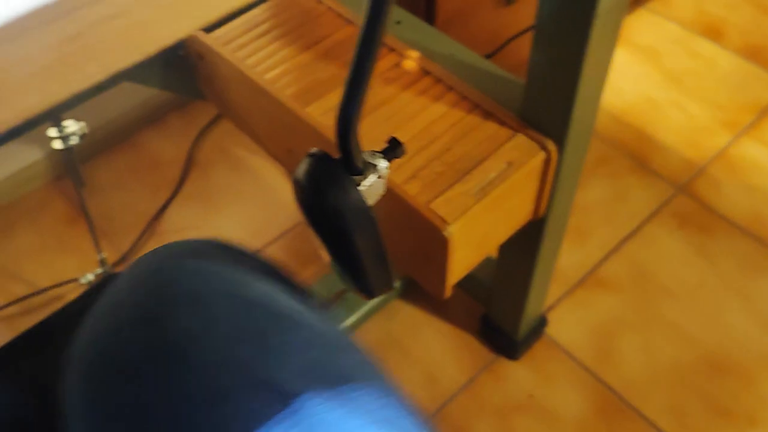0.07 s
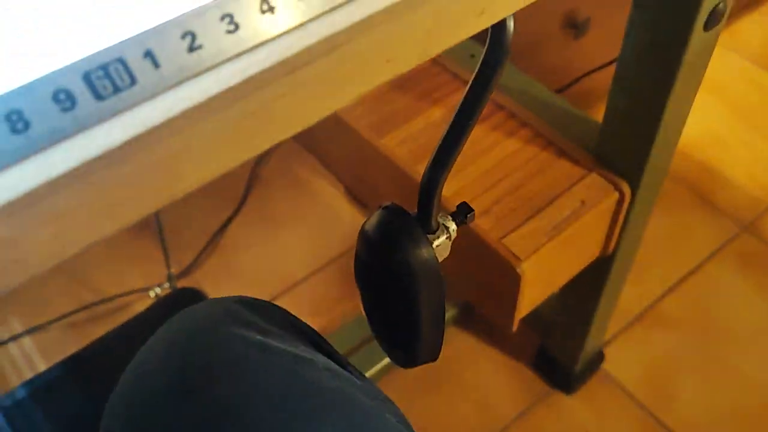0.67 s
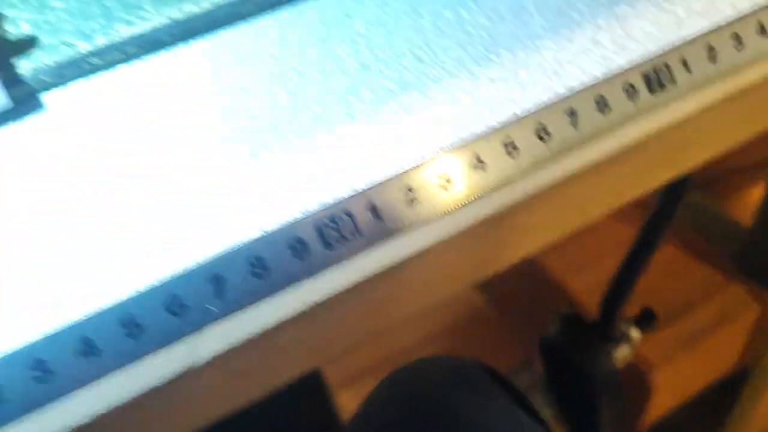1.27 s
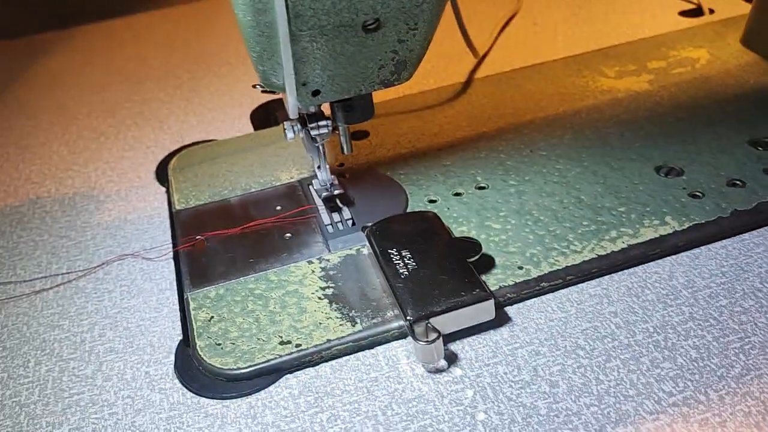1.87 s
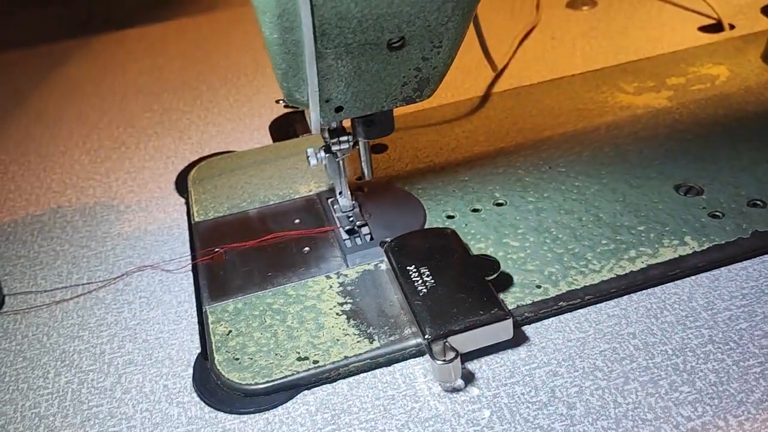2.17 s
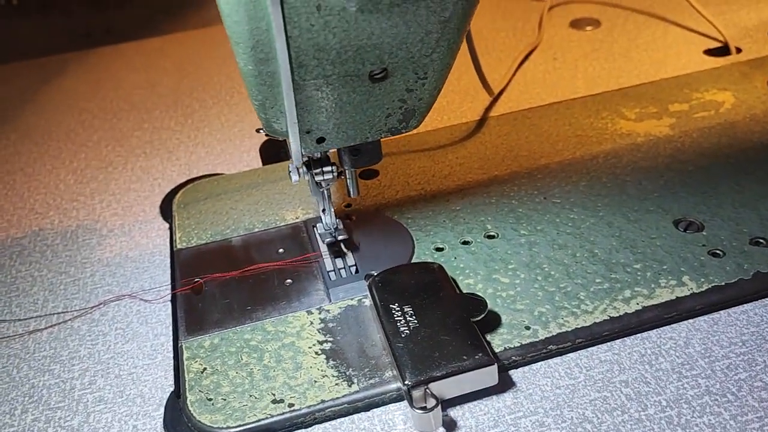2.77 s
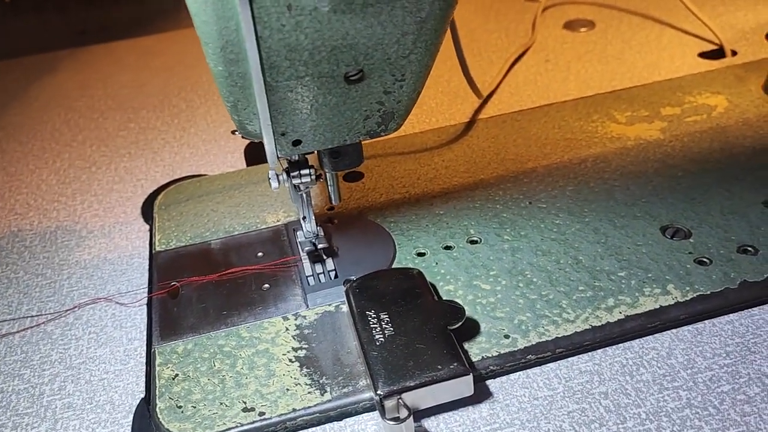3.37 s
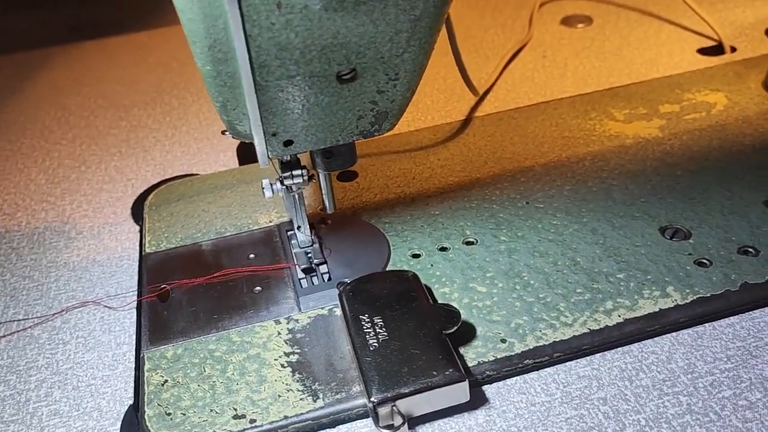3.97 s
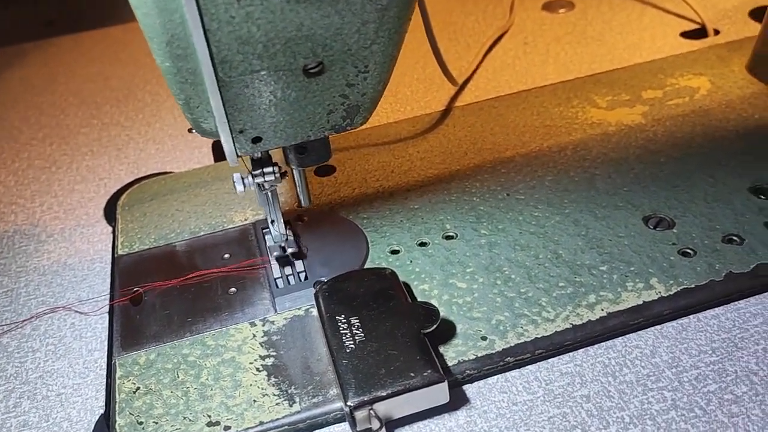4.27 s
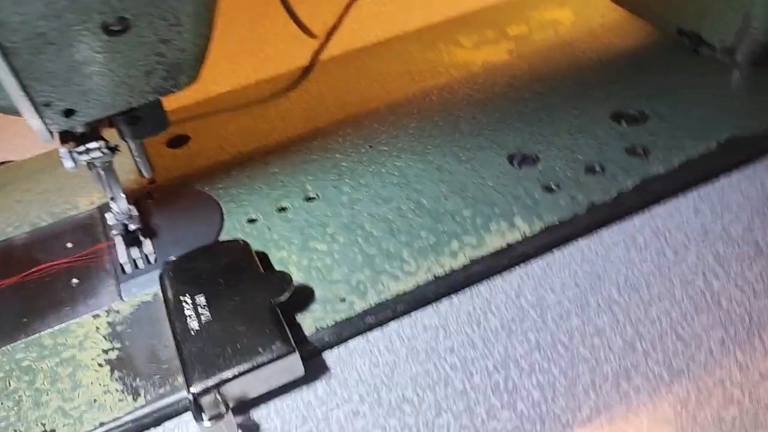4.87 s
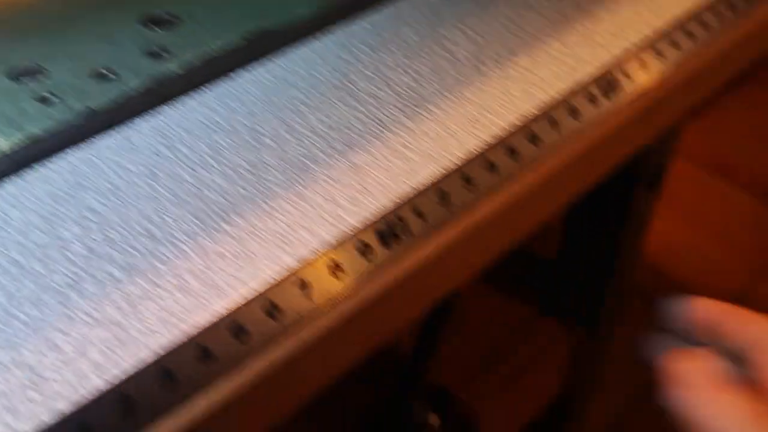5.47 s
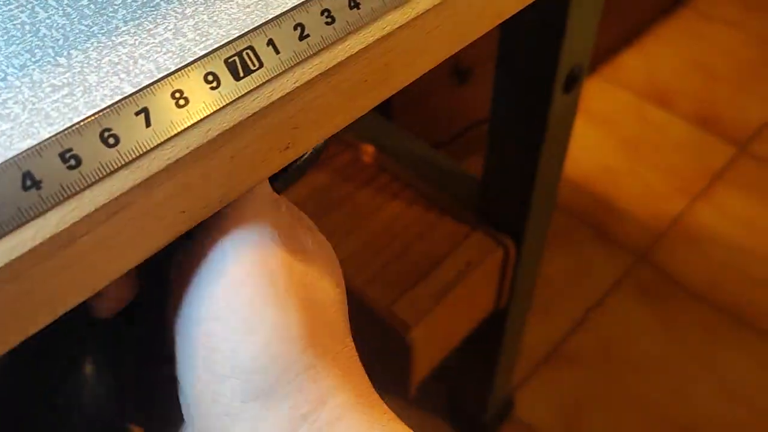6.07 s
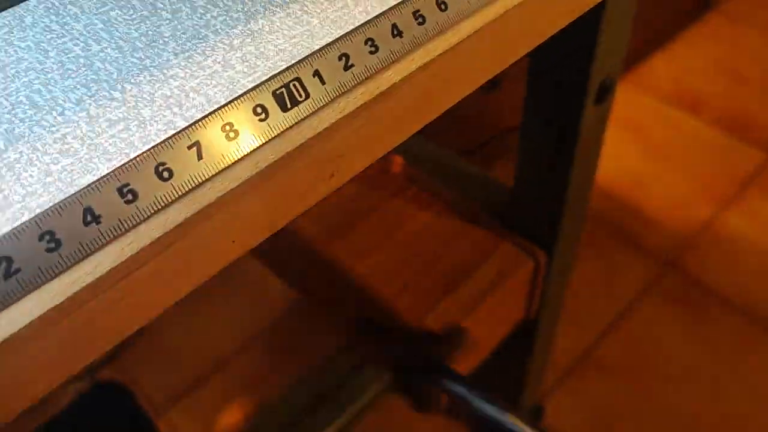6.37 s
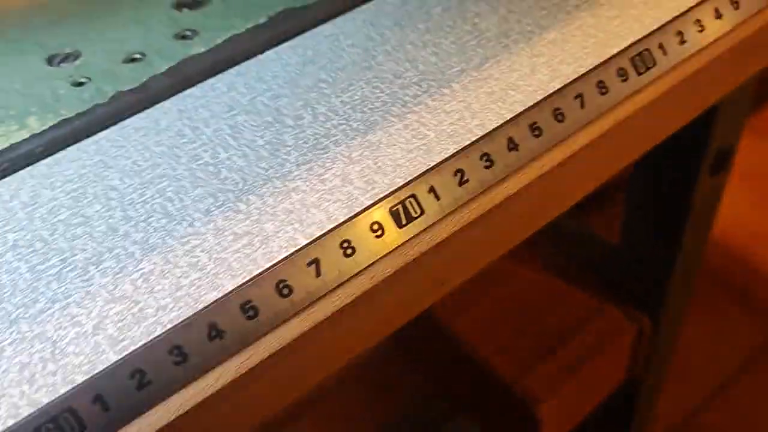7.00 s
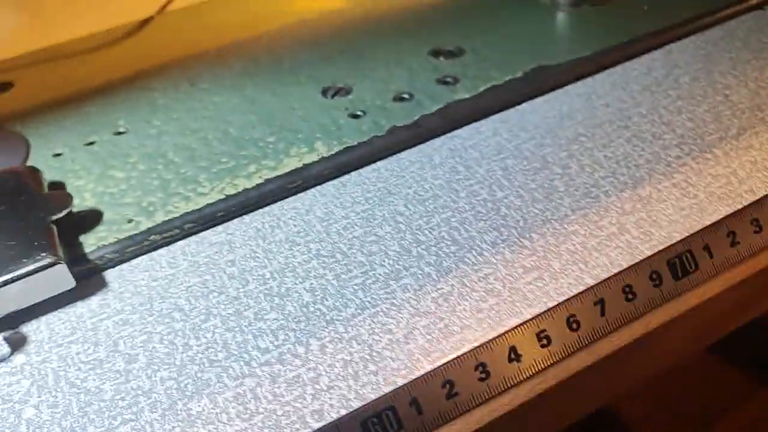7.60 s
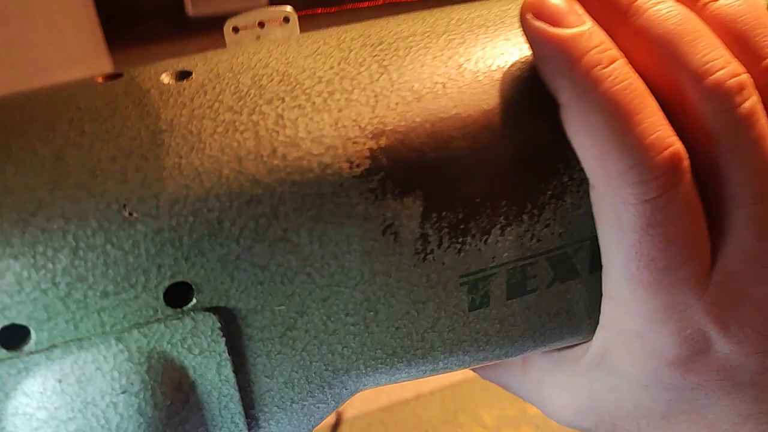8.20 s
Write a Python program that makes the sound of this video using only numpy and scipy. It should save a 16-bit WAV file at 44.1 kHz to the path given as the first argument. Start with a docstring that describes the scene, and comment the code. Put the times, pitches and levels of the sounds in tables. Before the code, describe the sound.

An industrial sewing machine's knee lever is worked close to the microphone in a small tiled room with faint background air. The presser foot drops at about 0.3, 2.0 and 3.7 seconds, each time with a clack, a bright latch snap and a landing click. It lifts in between, at about 1.0, 2.6 and 4.4 seconds, with a hard, brief metal chatter and a tight settling clack. The wooden table thuds softly under every stroke. Around 4.9 seconds a finger brushes the microphone on the left, followed by faint clothing rustle and low handling bumps. From 6.1 to 6.3 seconds the steel lever knocks lightly and slides out of its socket. Its padded end thumps down at 7.3 seconds, the steel clinks at 7.4, and a louder ringing clang follows near 7.7. Faint handling and rustling trail off just after 8 seconds.

```python
"""In a small tiled room, close to a phone, the knee lifter of an industrial sewing machine is worked
six times. By turns it drops the presser foot (the latch snaps free, the foot lands) and lifts it (the
linkage chatters against its stop, then settles); the table thuds under each stroke. A finger brushes
the left microphone and the grip shifts. Then the steel knee lever is pulled from its socket and laid
down, pad first, and rings."""
import sys
import numpy as np
from scipy import signal
from scipy.fft import rfft, irfft
from scipy.io import wavfile
from scipy.ndimage import uniform_filter1d

SR = 44100
rng = np.random.default_rng(int(sys.argv[2]) if len(sys.argv) > 2 else 0)


def wrap_up_sound(samples):
    """Save the sound to the file named by the first command line argument, as 16-bit audio."""
    columns = np.atleast_2d(samples).T
    # keep every value between -1 and 1, then stretch to whole-number steps
    tamed = np.clip(columns, -1, 1)
    steps = np.round(tamed * 32767).astype(np.int16)
    wavfile.write(sys.argv[1], SR, steps)


N = 363384

# Tone curves of room air, cloth, table top, fingertip and lever pad.
# Each row: frequency in Hz, relative level in dB.
AIR_EQ = [(15, -26), (25, 4.5), (108, 0), (212, -3), (293, -3.5), (427, -10.5), (503, -9.5), (575, -10.5),
          (1290, -16.5), (2110, -16), (3080, -24), (5730, -26.5), (7920, -33), (14800, -28), (16000, -35.5)]
CLOTH_EQ = [(88, -39), (150, -9), (179, -16.5), (209, -8), (291, 1.5), (341, -8), (504, -10.5),
            (854, -21.5), (3350, -24), (13400, -36), (16000, -35.5)]
TABLE_EQ = [(30, -22), (70, -12.5), (110, -7.5), (135, -3), (158, 7.5), (185, -4.5), (240, -7.5), (340, -4),
            (480, -11), (700, -24.5), (1500, -51), (4000, -79)]
FINGER_EQ = [(30, -22), (70, -3), (130, 1), (250, -8), (800, -5.5), (1200, -7.5), (4800, -15.5),
             (6500, -10.5), (7900, -21.5), (14400, -14.5), (16000, -17)]
PAD_EQ = [(30, -29), (100, -16), (170, -5.5), (270, 2), (380, -6), (520, -12), (750, -20.5), (1100, -29.5),
          (4000, -42), (12000, -61)]
# Tone curves of the noisy attack of each metal hit. Each row: frequency in Hz, relative level in dB.
CLACK_EQ = [(180, -53.5), (300, -24), (814, -6.5), (1210, -13.5), (1560, -4.5), (2400, -1), (2930, -5.5),
            (4750, -9.5), (7820, -26.5), (9090, -21.5), (10900, -29), (14500, -38.5), (16000, -49.5)]
SNAP_EQ = [(290, -47.5), (500, -20.5), (640, -11.5), (1460, -13), (3390, -6.5), (5240, -8.5), (5970, -2.5),
           (6900, -5.5), (7530, -7.5), (8210, -10.5), (11800, -12.5), (14700, -3), (16000, -14)]
STOP_EQ = [(180, -51.5), (300, -27.5), (537, -34), (787, -19), (1190, -9), (1460, -18), (1870, 0),
           (2440, 1), (3700, -13.5), (4520, -4.5), (7820, -19), (14200, -27.5), (16000, -33.5)]
SOCKET_EQ = [(180, -47), (300, -17.5), (634, -0.5), (842, 1.5), (1660, -20), (2030, 5), (2700, -12),
             (2980, -1.5), (3700, -13.5), (5160, -13), (6740, -29.5), (11100, -37), (16000, -62)]
CLANG_EQ = [(100, -35), (250, -7.5), (620, -0.5), (900, -7.5), (2300, -1), (3000, 2), (4000, -9.5),
            (5400, -5), (6500, -13), (8200, -23), (9000, -16), (10300, -14.5), (11500, -34), (15500, -31)]
# The room's tail. Each row: frequency in Hz, time to fade by 60 dB (t60) in seconds.
ROOM_T60 = [(150, .65), (600, 0.76), (2000, 0.49), (4500, 0.48), (8000, .36), (15000, 0.28)]

# The ring of the machine head with its linkage, and of the latch.
# Each row: frequency in Hz, relative level in dB, t60 in seconds, pan (left minus right) in dB.
HEAD_MODES = [(891.3, -5.5, 0.067, 1), (1183, -6, 0.037, -9), (1636, -5, 0.031, -8),
              (1820, -4, 0.036, -1.5), (1913, -0.5, 0.044, -10.5), (2130, -16, 0.0099, 1),
              (2397, -2, 0.04, 0.5), (2677, -1.5, 0.027, -6), (2800, -1.5, .025, -7),
              (3235, -3, .025, -6.5), (3550, -5.5, .025, 1.5), (3787, -3, 0.03, -3.5),
              (4450, -14, 0.026, 11), (4560, -7, 0.026, -3), (5860, -17, 0.026, 8), (6420, -12, 0.014, 7.5)]
LATCH_MODES = [(2800, -8, .02, -5.5), (3280, -4, .02, -5.5), (3450, -1.5, 0.047, -4),
               (3630, -3.5, .025, -5), (5600, -10, .02, -4.5), (6730, -9.5, .02, 4),
               (9900, -10.5, .02, 2.5), (14500, -8, .04, 9), (14800, -5, .04, 15)]
# The ring of the free steel lever. Each row: frequency in Hz, relative level in dB when struck on the
# shaft, the same on the clamp, t60 in seconds, pan in dB.
LEVER_MODES = [(590, -15, -11, .12, -2), (620, -11, -5, .16, -2), (1168, -9, -22, .4, -2),
               (1733, -9, -26, .42, 0), (1976, -5, -8, .42, -1), (2912, -3, -8, .4, -2),
               (2937, -4, 1, .38, -2), (3010, -10, -7, .3, 0), (3104, -6, -13, .32, 0),
               (3235, -12, -20, .28, 0), (3454, -8, -7, .4, 0), (3488, -8, -14, .42, 0),
               (4786, -8, -10, .42, -2), (4900, -12, -22, .3, 0), (5340, -16, -11, .38, 0),
               (5362, -13, -11, .4, 0), (5518, -24, -16, .3, 0), (7258, -24, -20, .38, 0),
               (9808, -40, -23, .14, 0), (10220, -38, -17, .22, 0)]

# Sleeves and trousers rub. Each row: peak time in seconds, level in dB.
RUSTLES = [(.3, -67), (1.65, -65), (5.1, -58), (5.6, -60.5), (6.55, -60.5), (8.1, -56)]
# Strokes that drop the foot. Each row: take-up of slack in seconds, its level in dB, bearing on the
# latch in seconds, snap in seconds, its level in dB, its chatter in seconds, landing in seconds,
# its level in dB.
DROPS = [(0.2845, -20.5, 0.4635, 0.4944, -19.5, .0075, 0.5976, -22),
         (2.0044, -35, 2.183, 2.222, -14, .0028, 2.3427, -33),
         (3.6766, -17, 3.8458, 3.8792, -15, .0048, 3.9775, -16)]
# Further linkage clacks, played like the take-ups. Each row: start in seconds, level in dB.
FURTHER_CLACKS = [(0.291, -23), (0.3033, -18.5)]
# Knee and hand bump the table. Each row: start in seconds, level in dB, tilt in dB per octave.
TABLE_BUMPS = [(.385, -45, -1), (.725, -54.5, -2), (.885, -59, 5), (1.961, -52.5, -4.5), (6.18, -49, -1.5)]
# Dry joints squeak or groan. Each row: start in seconds, length in seconds, pitch in Hz, level in dB.
SQUEAKS = [(0.466, 0.085, 390, -49.5), (2.758, .016, 2900, -53), (3.651, 0.011, 1248, -44.5),
           (5.887, 0.01, 2000, -64.5), (7.191, 0.0073, 2010, -59)]
# Strokes that lift the foot. Each row: take-up in seconds, its level in dB, hit on the stop in
# seconds, settling on the latch in seconds, its level in dB.
LIFTS = [(1.0167, -18.5, 1.0898, 1.2886, -12.5), (2.6325, -27, 2.7817, 3.0406, -12),
         (4.3576, -17.5, 4.442, 4.658, -17)]
# Loose parts tick. Each row: start in seconds, level in dB.
TICKS = [(1.9665, -40), (2.677, -45), (2.709, -43), (6.636, -58), (7.194, -57.5)]
# A finger rubs. Each row: start in seconds, length in seconds, level in dB, tilt in dB per octave.
BRUSHES = [(4.837, 0.11, -54, 1.5), (4.869, 0.0037, -35.5, 1.5), (4.885, 0.096, -39, 1.5),
           (4.899, 0.031, -26.5, -1), (4.948, 0.0227, -34.5, -1.5), (5.002, 0.09, -54, 2),
           (5.09, 0.3, -60, 0), (5.385, 0.005, -41.5, -4)]
# The grip shifts on the phone. Each row: start in seconds, length in seconds, level in dB.
GRIP_BUMPS = [(5.333, 0.021, -51), (5.491, .025, -48), (5.522, 0.033, -54), (5.772, 0.044, -60.5),
              (7.831, 0.07, -51), (7.92, 0.027, -55), (8.122, 0.057, -56)]
# The lever knocks in its socket. Each row: start in seconds, level in dB, chatter in seconds.
SOCKET_KNOCKS = [(6.1312, -43, 0.02), (6.169, -43.5, 0.015), (6.2135, -44.5, 0.0065), (6.305, -38, 0.01),
                 (6.313, -32, 0.013), (6.321, -31, 0.01)]
# The lever's padded end lands. Each row: start in seconds, level in dB.
PAD_KNOCKS = [(7.302, -38.5), (7.401, -36.5), (7.668, -38)]
# The lever's steel lands. Each row: start in seconds, level in dB, bass and treble against the mids
# in dB, pan in dB, chatter in seconds, reverb send in dB, spot struck from 0 (shaft) to 1 (clamp).
CLANGS = [(7.4008, -21.3, -5, -13, -0.5, 0.003, 4, 0), (7.6505, -27.5, -9, -31.5, -1, 0.0084, 1, 0.36),
          (7.6688, -10.7, -10.5, -2.5, -1.5, 0.0074, -1.5, 0.73)]

# The phone starts by the knee lever, then is over the needle plate.
# Each position: offsets to pan, reverb send and treble in dB.
AT_KNEE, AT_NEEDLE = (.5, 1.3, 3.5), (-4.5, -.2, -1)
PHONE_MOVES_S = 1.5
FIRM_DB, LIGHT_DB = -18, -44  # a firm hit and a light knock
LOAD_SHARE = .17  # how far toward the stop the foot's spring loads the table
BEARING_LEAD_S, SETTLING_LEAD_S = .01, .025  # the table gives just before the linkage meets the latch


def gain(db):
    """Decibels to gain."""
    return 10 ** (np.asarray(db) / 20)


def unit(x):
    """Scale to rms 1."""
    return x / np.sqrt(np.mean(x ** 2))


def loudest(x):
    """Rms over the loudest four milliseconds."""
    return np.sqrt(uniform_filter1d(np.mean(x ** 2, 0), size=176).max())


def pan(pan_db):
    """Left and right gains; positive leans left."""
    return gain(np.array([[.5], [-.5]]) * pan_db)


def decay(t, t60):
    """An envelope that falls 60 dB in t60 seconds."""
    return np.exp(-np.log(1000) * t / t60)


def curve_at(curve, hz):
    """Read a curve over log frequency."""
    points_hz, values = np.transpose(curve)
    return np.interp(np.log(hz + 1), np.log(points_hz), values)


def equalise(x, curve, tilt_db=0):
    """Shape by a tone curve, tilted by tilt_db an octave, at rms 1."""
    hz = np.fft.rfftfreq(x.shape[-1], 1 / SR)
    octaves = np.log2(np.maximum(hz, curve[0][0]) / curve[0][0])
    return unit(irfft(rfft(x) * gain(curve_at(curve, hz) + tilt_db * octaves), x.shape[-1]))


def crossover(x, hz):
    """The bands below and above a frequency."""
    return [signal.sosfilt(signal.butter(3, hz, kind, fs=SR, output="sos"), x)
            for kind in ("low", "high")]


def stereo_noise(size, mono_below_hz=450):
    """Noise at two microphones: long waves reach both alike, short ones differ."""
    mid, side = rfft(rng.standard_normal((2, size)))
    hz = np.fft.rfftfreq(size, 1 / SR)
    side = side * hz / np.hypot(hz, mono_below_hz)
    return unit(irfft(np.array([mid + side, mid - side]), size))


def add(track, s, sound):
    """Mix a sound in at s seconds."""
    start = int(s * SR)
    track[:, start:start + sound.shape[1]] += sound[:, :N - start]


def room_tone(level_db=-65.5):
    """A quiet bed of room air."""
    return gain(level_db) * equalise(stereo_noise(N, mono_below_hz=100), AIR_EQ)


def cloth_rustle(swell_db_per_s=80, fade_db_per_s=19, still_db=-76, flutter_db=2):
    """Cloth rubs unevenly as the body moves: a quick swell, a slow fade."""
    t = np.arange(N) / SR
    flutter = np.interp(t, np.linspace(0, N / SR, 200), rng.standard_normal(200))
    swells = [db - np.maximum(swell_db_per_s * (s - t), fade_db_per_s * (t - s)) for s, db in RUSTLES]
    envelope_db = np.maximum(np.max(swells, 0), still_db) + flutter_db * flutter
    return gain(envelope_db) * equalise(stereo_noise(N), CLOTH_EQ)


def scrape(s, length_s, db, grain_db=4):
    """Sliding steel grates louder as the load grows."""
    out = np.zeros((2, N))
    grains = gain(grain_db * np.repeat(rng.standard_normal(SR // 100), 100))
    grit = equalise(stereo_noise(len(grains)) * grains, CLACK_EQ)[:, :int(length_s * SR)]
    add(out, s, gain(db) * unit(grit * np.linspace(.4, 1, grit.shape[1])))
    return out


def joint_scrapes(lead_s=.035, against_hit_db=-37):
    """Joints slide into each take-up and settling, scrape onto the latch and grate as the foot rises."""
    out = np.zeros((2, N))
    for start, db, bearing, *_ in DROPS:
        out += scrape(start - lead_s, lead_s, db + against_hit_db)
        out += scrape(bearing - BEARING_LEAD_S, length_s=.012, db=-51)
    for start, db, stop, settling, settling_db in LIFTS:
        out += scrape(start - lead_s, lead_s, db + against_hit_db)
        out += scrape(start + LOAD_SHARE * (stop - start), length_s=.045, db=-45 + db - FIRM_DB)
        out += scrape(settling - lead_s, lead_s, settling_db + against_hit_db)
    return out


def tiled_room(send, build_s=.0058, return_db=-1):
    """Diffuse echoes off tiles and walls build quickly and lose their treble first."""
    t = np.arange(SR) / SR
    hz, frame_s, cells = signal.stft(stereo_noise(SR), SR, nperseg=256)
    tail = signal.istft(cells * decay(frame_s, curve_at(ROOM_T60, hz)[:, None]), SR)[1][:, :SR]
    tail = tail * (1 - np.exp(-(t / build_s) ** 2))
    tail = tail / np.sqrt(np.sum(tail ** 2) / 2)
    return gain(return_db) * signal.fftconvolve(send, tail, axes=1)[:, :N]


def chatter(length_s, bounce, per_s=900):
    """The first contact, then quick small rebounds while the parts settle."""
    size = int(length_s * SR)
    force = bounce * np.sign(rng.standard_normal(size)) * (rng.random(size) < per_s / SR)
    force *= np.linspace(1, .5, size)
    force[0] = 1
    return force[None]


def ring(modes, t, waver_db, scatter_db=1, spread_rad=.7):
    """Damped modes, weighted anew by each hit, reach the two microphones out of step."""
    hz, db, t60, pan_db = np.transpose(modes)[:, :, None]
    weight, offset, skew = rng.standard_normal((3, len(hz), 1))
    # a loose part rocks, so each mode wavers in level and pitch on its own
    swell, slip = (np.array([np.interp(t, np.linspace(0, 1, count), row)
                             for row in rng.standard_normal((len(hz), count))]) for count in (50, 130))
    envelopes = gain(db + scatter_db * weight + waver_db * swell) * decay(t, t60)
    phase = 2 * np.pi * (hz * t + offset) + waver_db / 4 * slip
    channels = [envelopes * gain(side * pan_db / 2) * np.sin(phase + side * spread_rad * skew)
                for side in (1, -1)]
    return np.sum(channels, 1)


def balance(hit, bass_db, treble_db):
    """Set a hit's weight and bite against its mids."""
    bass, rest = crossover(hit, 1200)
    mids, treble = crossover(rest, 6000)
    bands = (bass_db, bass), (0, mids), (treble_db, treble)
    hit = sum(gain(db) * band / loudest(band) for db, band in bands)
    return hit / loudest(hit)


def metal_hits(hits, modes, attack_eq, ring_db, attack_t60=.028, bounce=.35, send_trim_db=0, waver_db=0):
    """Metal on metal: rebounds excite a crack of dense modes, the part rings on. Gives direct and send."""
    direct, send = np.zeros((2, 2, N))
    t = np.arange(int(SR * max(.15, *(mode[2] for mode in modes)))) / SR
    for s, db, bass_db, treble_db, pan_db, chatter_s, send_db in hits:
        crack = equalise(stereo_noise(len(t)), attack_eq) * decay(t, attack_t60)
        crack = signal.fftconvolve(crack, chatter(chatter_s, bounce), axes=1)[:, :len(t)]
        tone = ring(modes, t, waver_db)
        hit = balance(crack / loudest(crack) + gain(ring_db) * tone / loudest(tone), bass_db, treble_db)
        hit = gain(db) * hit * np.std(hit) / np.std(hit, axis=1, keepdims=True)  # centred before panning
        add(direct, s, hit * pan(pan_db))
        add(send, s, hit * gain(send_db + send_trim_db))
    return np.array([direct, send])


def placed(s, db, bass_db, treble_db, chatter_s, send_db, pan_db=0):
    """One hit on the machine, offset for where the phone is at that moment."""
    side_db, far_db, bright_db = AT_KNEE if s < PHONE_MOVES_S else AT_NEEDLE
    return s, db, bass_db, treble_db + bright_db, pan_db + side_db, chatter_s, send_db + far_db


def clack(s, db, bass_db=-14.5, treble_db=-15, chatter_s=.0065, send_db=-7):
    """One hit in the linkage: the harder, the thinner and brighter."""
    tilt_db = .5 * (db - FIRM_DB)
    return placed(s, db, bass_db - tilt_db, treble_db + tilt_db, chatter_s, send_db)


def linkage_clacks():
    """The linkage takes up its slack, with a few further clacks, and rings the machine head."""
    hits = [clack(s, db) for s, db, *_ in DROPS + FURTHER_CLACKS]
    hits += [clack(s, db, bass_db=-16.5, treble_db=-16, chatter_s=.0075) for s, db, *_ in LIFTS]
    return metal_hits(hits, HEAD_MODES, CLACK_EQ, ring_db=1.5, send_trim_db=-2)


def booms(thuds, curve, rise_s, body_t60, tail_t60, tail_db, mono_below_hz):
    """Soft, heavy hits: a brief boom that the room holds on to."""
    out, t = np.zeros((2, N)), np.arange(SR) / SR
    envelope = (1 - np.exp(-t / rise_s)) * (decay(t, body_t60) + gain(tail_db) * decay(t, tail_t60))
    for s, db, *tilt_db in thuds:
        boom = equalise(stereo_noise(SR, mono_below_hz), curve, *tilt_db) * envelope
        add(out, s, boom * gain(db) / np.std(boom[:, :SR // 20]))
    return out


def table_thuds():
    """The wooden top booms when bumped and as it takes the load at each stage of a stroke."""
    thuds = list(TABLE_BUMPS)  # each row: start in seconds, level in dB, tilt in dB per octave
    for start, db, bearing, snap, *_ in DROPS:
        take_up_db = -45.5 + .55 * (db - FIRM_DB)
        thuds += [(start, take_up_db, 3), (bearing - BEARING_LEAD_S, -47, -2), (snap, -44.5, 0)]
    for start, _, stop, settling, _ in LIFTS:
        loaded = start + LOAD_SHARE * (stop - start)
        thuds += [(loaded, -46, 1), (stop, -48, 2), (settling - SETTLING_LEAD_S, -49.5, -1)]
    return booms(thuds, TABLE_EQ, rise_s=.017, body_t60=.34, tail_t60=.5, tail_db=1, mono_below_hz=600)


def head_modes(centre_hz, boost_db, width_hz=140):
    """The head's modes, with those near one frequency struck harder."""
    return [(hz, db + boost_db * np.exp(-((hz - centre_hz) / width_hz) ** 2), *rest)
            for hz, db, *rest in HEAD_MODES]


def latch_bearings():
    """The linkage bears on the latch with a soft, ringing clink."""
    hits = [clack(s, db=-31, bass_db=-15.5, treble_db=-17, send_db=-4) for _, _, s, *_ in DROPS]
    return metal_hits(hits, head_modes(1930, boost_db=8), CLACK_EQ, ring_db=3, send_trim_db=-2)


def joint_squeaks():
    """Dry joints give short, pure squeaks and groans."""
    out = np.zeros((2, N))
    for s, length_s, hz, db in SQUEAKS:
        t = np.arange(int(length_s * SR)) / SR
        add(out, s, gain(db) * unit(np.sin(2 * np.pi * hz * t) * np.hanning(len(t)))[None])
    return out


def latch_snaps():
    """The latch springs free: all bite, hardly any bass."""
    hits = [placed(s, db, bass_db=-32, treble_db=.5, chatter_s=chatter_s, send_db=-2, pan_db=4)
            for _, _, _, s, db, chatter_s, _, _ in DROPS]
    return metal_hits(hits, LATCH_MODES, SNAP_EQ, ring_db=-4.5, attack_t60=.03, bounce=.45,
                      send_trim_db=-4.5)


def steel_ticks(touches):
    """Light, bright touches of steel, ringing with the machine head's modes."""
    hits = [placed(s, db, bass_db=-7, treble_db=-5.5, chatter_s=.007, send_db=-3.5) for s, db in touches]
    return metal_hits(hits, HEAD_MODES, CLACK_EQ, ring_db=1.5, send_trim_db=-2)


def foot_landings(heel_lead_s=.0185, heel_db=-32.5):
    """The presser foot ticks down heel first, then clacks flat."""
    heels = steel_ticks([(s - heel_lead_s, heel_db) for *_, s, _ in DROPS])
    hits = [clack(s, db, bass_db=-12, treble_db=-11.5, chatter_s=.0075, send_db=-7.5)
            for *_, s, db in DROPS]
    return heels + metal_hits(hits, HEAD_MODES, CLACK_EQ, ring_db=1.5, send_trim_db=-2)


def stop_chatter():
    """At the top of a lift the linkage slams into its stop and chatters."""
    hits = [placed(s, db=-11.5, bass_db=-16, treble_db=-12.5, chatter_s=.0185, send_db=-8.5)
            for _, _, s, *_ in LIFTS]
    return metal_hits(hits, head_modes(4520, boost_db=4), STOP_EQ, ring_db=-1, attack_t60=.034,
                      bounce=.5, send_trim_db=-.5)


def latch_settlings():
    """The linkage falls back on the latch with a tight clack."""
    hits = [clack(s, db, bass_db=-16, treble_db=-17, chatter_s=.005, send_db=-8.5) for *_, s, db in LIFTS]
    return metal_hits(hits, head_modes(1600, boost_db=7), CLACK_EQ, ring_db=1.5, send_trim_db=-2)


def finger_brushes(grain_db=4, right_leak_db=-35):
    """Skin sticks and slips over the left microphone port."""
    out = np.zeros((2, N))
    for s, length_s, db, tilt_db in BRUSHES:
        grains = gain(grain_db * np.repeat(rng.standard_normal(SR // 90), 30))
        rub = equalise(rng.standard_normal(len(grains)) * grains, FINGER_EQ, tilt_db)[:int(length_s * SR)]
        envelope = signal.windows.tukey(len(rub), .2) * np.linspace(1, .2, len(rub))
        add(out, s, unit(rub * envelope) * gain([[db], [db + right_leak_db]]))
    return out


def grip_bumps(below_hz=120, pan_db=-8):
    """The shifting hand bumps the phone's case: low, soft thumps."""
    out = np.zeros((2, N))
    for s, length_s, db in GRIP_BUMPS:
        rumble = crossover(rng.standard_normal(SR // 4), below_hz)[0][-int(length_s * SR):]
        add(out, s, unit(rumble * np.hanning(len(rumble))) * gain(db) * pan(pan_db))
    return out


def lever_modes(spot, longest_t60=np.inf):
    """The spot struck decides which modes speak; a hand on the lever cuts their ring short."""
    return [(hz, shaft_db + spot * (clamp_db - shaft_db), min(t60, longest_t60), pan_db)
            for hz, shaft_db, clamp_db, t60, pan_db in LEVER_MODES]


def socket_knocks(pan_db=8):
    """The held lever knocks in its socket: dull and distant while loose, brighter and drier if jerked."""
    out = 0
    for s, db, chatter_s in SOCKET_KNOCKS:
        jerk_db = db - LIGHT_DB
        bass_db, treble_db, send_db = 1 - 1.15 * jerk_db, -18 + .8 * jerk_db, -2 - .45 * jerk_db
        hit = s, db, bass_db, treble_db, pan_db, chatter_s, send_db
        out += metal_hits([hit], lever_modes(.5, longest_t60=.2), SOCKET_EQ,
                          ring_db=-17 + .55 * jerk_db, attack_t60=.027, bounce=.37)
    return out


def pad_thumps():
    """The lever's padded end lands with a muffled thump."""
    return booms(PAD_KNOCKS, PAD_EQ, rise_s=.0031, body_t60=.26, tail_t60=.78, tail_db=4,
                 mono_below_hz=500)


def lever_clangs(shaft_ring_db=-3, clamp_ring_db=-5.2):
    """The bare steel lands on the floor, rocks and rings out into the room."""
    out = 0
    for *hit, spot in CLANGS:
        ring_db = shaft_ring_db + spot * (clamp_ring_db - shaft_ring_db)
        out += metal_hits([hit], lever_modes(spot), CLANG_EQ, ring_db, attack_t60=.057, waver_db=2.6)
    return out


def scene(friction_send_db=-3):
    """The mix: all the metal shares one reverb; the bed, thuds and handling bypass it."""
    bed = room_tone() + cloth_rustle()
    shaft_sliding_out = scrape(6.282, length_s=.048, db=-43)
    friction = joint_scrapes() + joint_squeaks() + shaft_sliding_out
    direct, send = (linkage_clacks() + latch_bearings() + latch_snaps() + foot_landings() + stop_chatter()
                    + latch_settlings() + steel_ticks(TICKS) + socket_knocks() + lever_clangs())
    metal = direct + friction + tiled_room(send + gain(friction_send_db) * friction)
    return bed + metal + table_thuds() + finger_brushes() + grip_bumps() + pad_thumps()


def record(dry, top_hz=15800):
    """The phone rounds the sharpest peaks and cuts the top."""
    return signal.sosfilt(signal.ellip(10, .2, 80, top_hz, fs=SR, output="sos"), np.tanh(dry))


dry = scene()
out = record(dry)
wrap_up_sound(out)
```